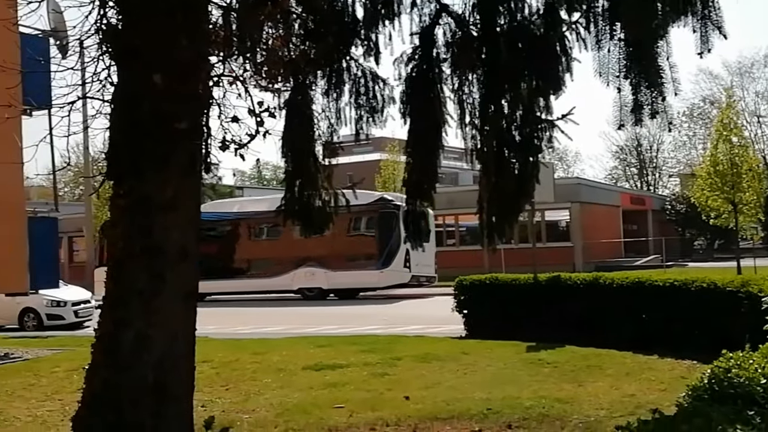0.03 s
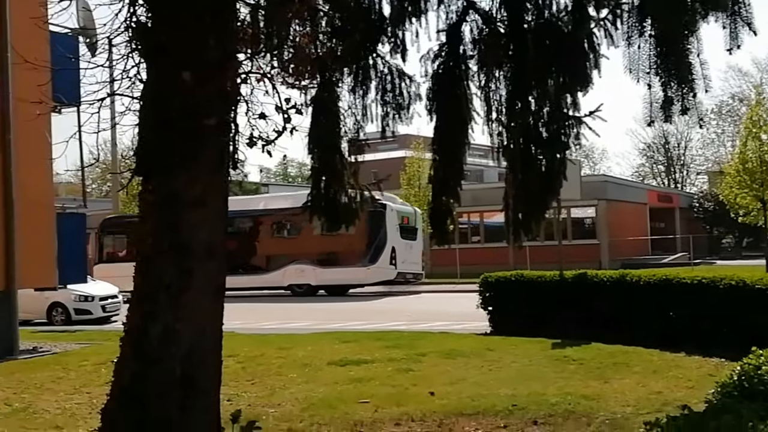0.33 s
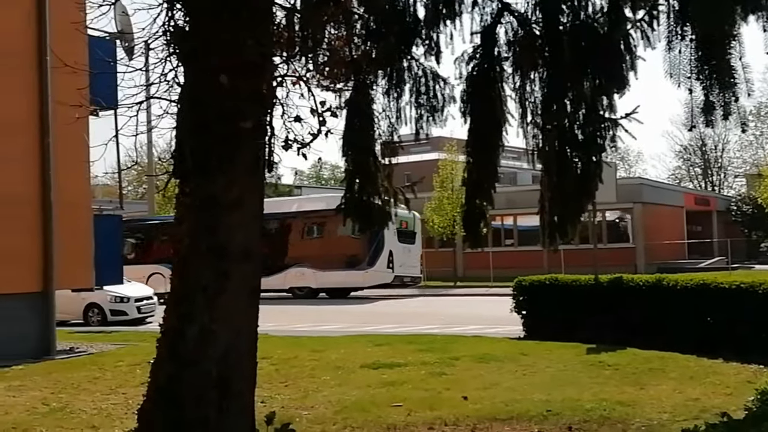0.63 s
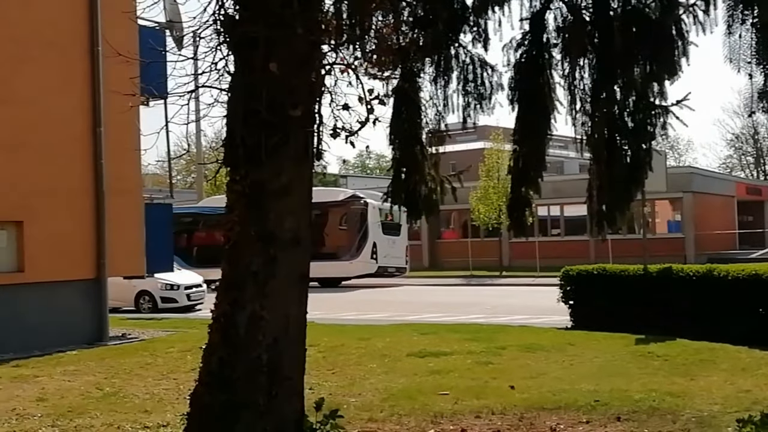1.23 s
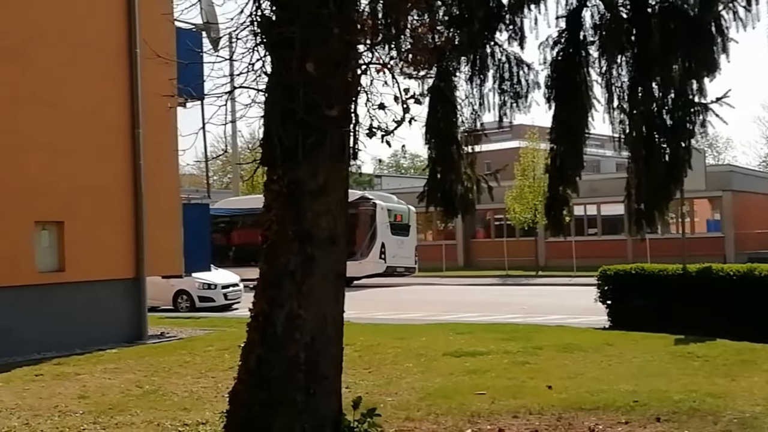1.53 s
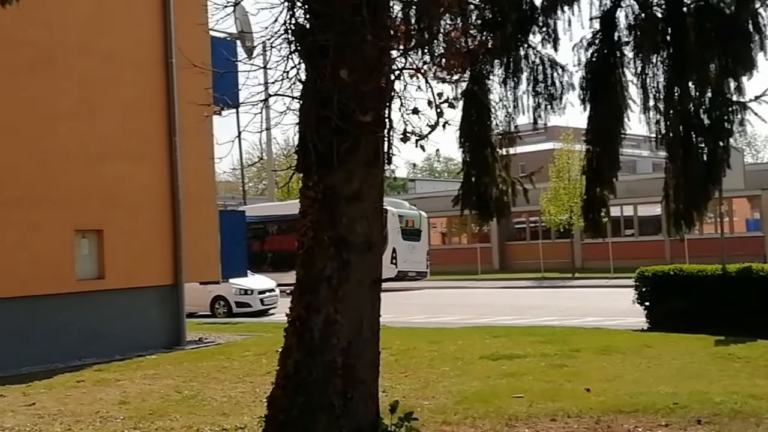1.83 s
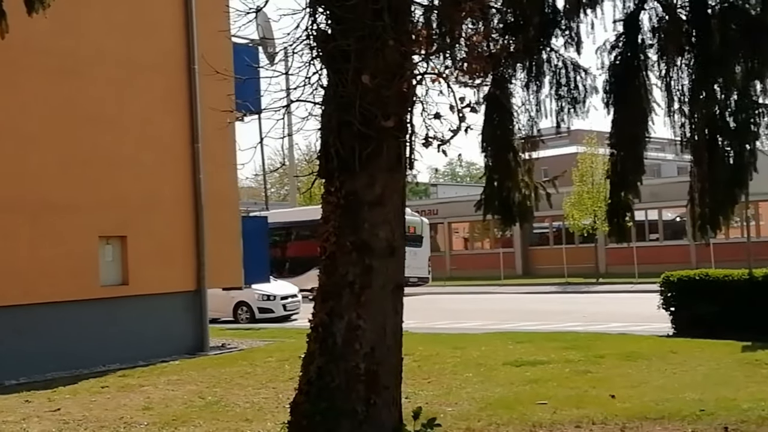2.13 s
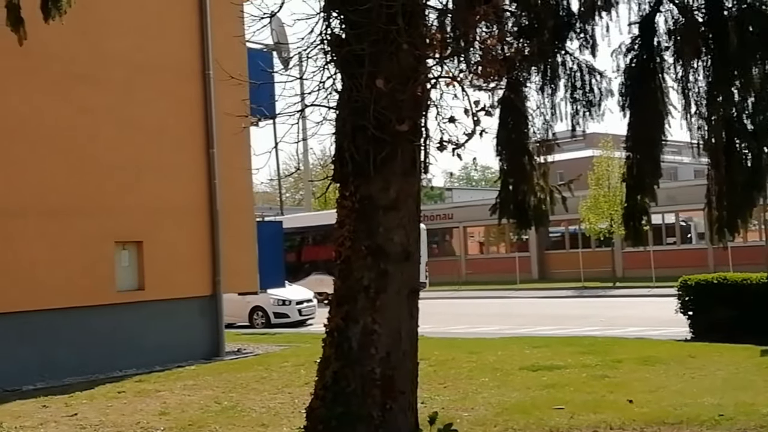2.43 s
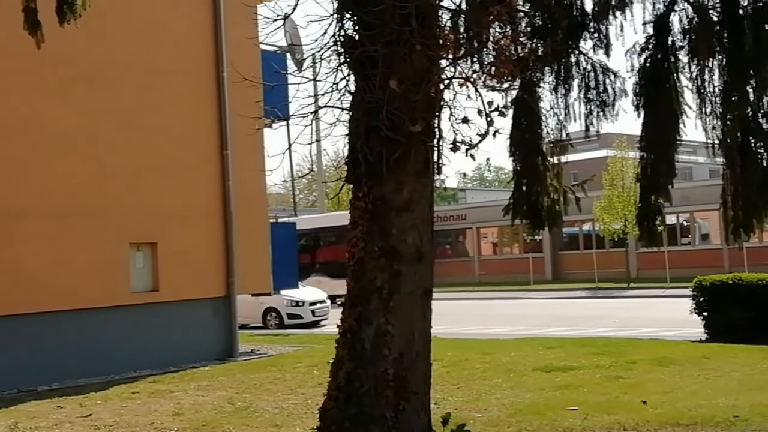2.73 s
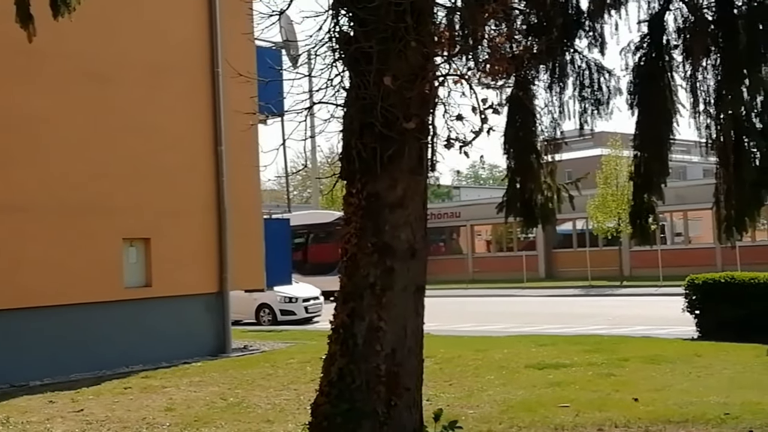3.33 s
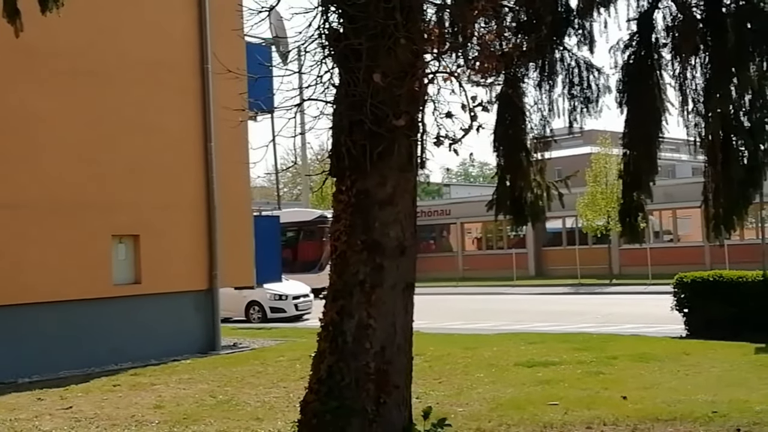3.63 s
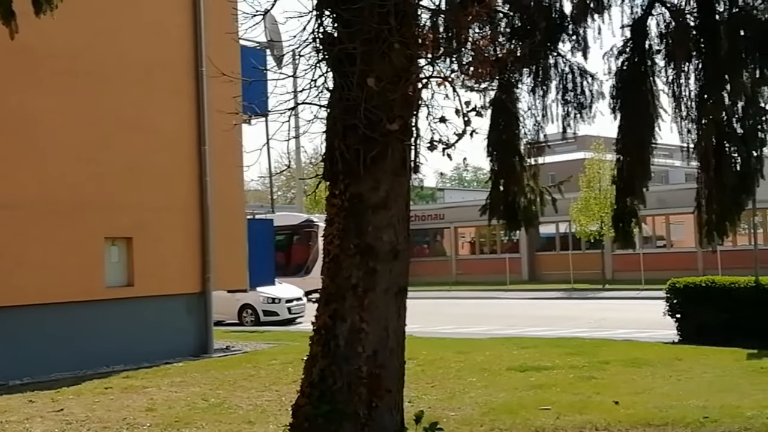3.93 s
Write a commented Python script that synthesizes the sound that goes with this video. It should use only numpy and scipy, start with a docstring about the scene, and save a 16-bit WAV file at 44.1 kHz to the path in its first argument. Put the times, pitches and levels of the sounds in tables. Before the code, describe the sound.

An electric bus slows along a street, heard across a lawn, its low rumble, sinking hum and tyre hiss drifting right. Faint thin whines fade by about 2 seconds. A high brake squeal comes at 1.8 seconds, a short air puff just after 2, then more squeals from 2.7 to 3.3 with a soft knock. A small bird whistles short notes, mostly between 1.5 and 3. The tyres turn grittier late.

```python
"""A sinking hum, body rumble, tyre roar and thin drive whines: an electric bus slows along a street,
heard across a lawn. Its brakes squeal briefly and a valve puffs air while the road noise drifts right.
A small bird whistles in the trees; house fronts answer the bird and the brakes.
Hum, whines, squeals and whistles are gliding sines; road noise and air are shaped stereo noise."""
import sys
import numpy as np
from scipy import signal
from scipy.fft import rfft, irfft, next_fast_len
from scipy.io import wavfile
from scipy.ndimage import uniform_filter1d, map_coordinates

SR = 44100
rng = np.random.default_rng(int(sys.argv[2]) if len(sys.argv) > 2 else 0)


def store_pcm(level_fs):
    """Save levels as 16-bit WAV."""
    pcm = np.round(np.clip(level_fs, -1, 1) * 32767).astype(np.int16)
    wavfile.write(sys.argv[1], SR, np.atleast_2d(pcm).T)


N = 176400
T = np.arange(N) / SR

# left-ear lag as the bus moves aside: (time [s], body [ms], tread [ms])
EAR_LAG = [(0, 0.21, -0.12), (.7, 0.27, 0.041), (1.4, 0.43, 0.072), (2.1, 0.66, 0.5), (4, 0.61, 0.67)]


def amp(db):
    """Decibels to gain."""
    return 10 ** (np.asarray(db) / 20)


def unit(x):
    """Scale to rms 1."""
    return x / np.sqrt(np.mean(x ** 2) + 1e-20)


def along(points, hz):
    """Interpolate (frequency [Hz], value) points on a log axis."""
    freqs, values = np.transpose(points)
    return np.interp(np.log(hz + 1), np.log(freqs + 1), values)


def curves(rows):
    """One value per sample for each column after the time."""
    times, *columns = np.transpose(rows)
    return [np.interp(T, times, column) for column in columns]


def wobble(rate_hz):
    """Smooth random curve, rate_hz knots a second."""
    return map_coordinates(rng.standard_normal(8000), [T * rate_hz + 2], mode="wrap")


def arch(start_s, length_s):
    """Half a sine of height 1."""
    return np.sin(np.pi * np.clip((T - start_s) / length_s, 0, 1))


def tone(hz):
    """Sine of rms 1 following a pitch curve."""
    return np.sqrt(2) * np.sin(2 * np.pi * np.cumsum(hz) / SR)


def filtered(x, response):
    """Apply a gain given as a function of frequency."""
    size = next_fast_len(N + SR // 2)
    return irfft(rfft(x, size) * response(np.fft.rfftfreq(size, 1 / SR)), size)[..., :N]


def colour(points):
    """Gain function from (frequency [Hz], gain [dB]) points."""
    return lambda hz: amp(along(points, hz))


def sides(pan_db):
    """Constant-power stereo gains; pan is left minus right."""
    gains = amp(np.array([[.5], [-.5]]) * pan_db)
    return gains / np.sqrt(np.mean(gains ** 2, axis=0))


def aside(x, lag_ms):
    """Delay the left ear, placing the sound to the right."""
    delayed = np.arange(N) - lag_ms * SR / 1000
    return np.array([map_coordinates(x[0], [delayed], mode="nearest"), x[1]])


def rush(gain, alike, pan, patchy_db):
    """Patchy stereo noise of rms 1; alike (left-right likeness, clipped to +-1) and pan go by Hz."""
    bins = signal.stft(rng.standard_normal((2, N)), nperseg=512)[2]
    patches = uniform_filter1d(rng.standard_normal(bins.shape[1:]), size=5, axis=0)
    patches = uniform_filter1d(patches, size=10, axis=1)
    pair = signal.istft(bins * amp(patchy_db * unit(patches)), nperseg=512)[1][:, :N]
    angle = lambda hz: np.arccos(np.clip(along(alike, hz), -1, 1)) / 2
    mid, side = filtered(pair, lambda hz: gain(hz) * np.array([np.cos(angle(hz)), np.sin(angle(hz))]))
    return unit(filtered(np.array([mid + side, mid - side]), lambda hz: sides(along(pan, hz))))


def hum():
    """Low, slightly unsteady note of the bus with two overtones."""
    # (time [s], pitch [Hz], level [dB])
    fundamental = [(0, 61.1, -53), (.3, 60.5, -46), (.75, 59.35, -49), (1.3, 57.2, -41), (1.55, 57.16, -42),
                   (1.9, 54.74, -44), (2.28, 53.06, -42.5), (2.5, 51.7, -39.5), (2.62, 51.3, -47.5),
                   (2.95, 51.82, -44), (3.45, 52.3, -49), (4, 53.5, -53)]
    # (time [s], second harmonic [dB], third harmonic [dB])
    overtones = [(0, -57, -64), (.35, -51, -66), (.9, -55, -58.5), (1.8, -57.5, -56.5), (2.3, -59, -49.5),
                 (2.75, -68, -66), (3.4, -57, -66), (3.75, -50, -54), (4, -47.5, -55)]
    hz, db = curves(fundamental)
    hz = hz + 0.33 * wobble(7.96)
    out = amp(db + 0.45 * wobble(12)) * tone(hz)
    for harmonic, level_db in enumerate(curves(overtones), start=2):
        out = out + amp(level_db + 2.4 * wobble(5.5)) * tone(harmonic * hz)
    return out * sides(0)


def rolling():
    """Low rumble, body drone, road roar and tread song, drifting right."""
    # (time [s], rumble [dB], drone [dB], roar [dB], tread [dB])
    levels = [(0, -45.5, -51, -55, -54.5), (.45, -45.5, -50.5, -55, -56), (1.2, -44.5, -49, -52.5, -55.5),
              (1.7, -43, -50, -49.5, -59.5), (2.1, -44, -48, -50, -71), (2.5, -45, -46.5, -53, -52.5),
              (2.9, -46, -50.5, -51, -51), (3.4, -47, -47.5, -49, -59), (3.75, -48, -48.5, -53, -59.5),
              (4, -48.5, -47.5, -50.5, -69)]
    # spectra: (frequency [Hz], relative level [dB])
    rumble_shape = [(20, -12), (40, 0), (62, 1), (80, -0.5), (115, -1), (160, -3.5), (210, -5),
                    (300, -21.5), (600, -44), (1500, -70)]
    drone_shape = [(90, -21), (150, -13.5), (195, -4), (245, 0), (310, -5), (370, -8), (450, -15.5),
                   (700, -38), (1500, -74)]
    roar_shape = [(150, -26), (330, -10), (520, -1.5), (680, -3), (900, -1.5), (1150, -9.5), (1450, -14.5),
                  (2200, -29), (4000, -44)]
    # (frequency [Hz], left-right likeness)
    body_alike = [(100, 2.2), (300, 1.8), (600, -0.8)]
    roar_alike = [(300, 0.96), (700, 0.93), (1000, 0.72), (1600, 0.1)]
    # (frequency [Hz], pan [dB])
    roar_pan = [(300, 7), (520, -3), (780, -9), (950, -5), (1200, 1.5), (2000, -18)]
    rumble_db, drone_db, roar_db, tread_db = curves(levels)
    rumble = amp(rumble_db) * rush(colour(rumble_shape), body_alike, [(100, 0)], patchy_db=0.5)
    drone = amp(drone_db) * rush(colour(drone_shape), body_alike, [(250, 1), (500, -6.5)], patchy_db=0.5)
    roar_gain = amp(roar_db + 0.82 * wobble(8.9))
    roar = roar_gain * rush(colour(roar_shape), roar_alike, roar_pan, patchy_db=1)
    body_ms, tread_ms = curves(EAR_LAG)
    return aside(rumble + drone + roar, body_ms) + aside(amp(tread_db) * tread(), tread_ms)


def tread():
    """Tread song: a noise band that sinks and narrows as the bus slows."""
    start_hz, end_hz, start_octaves, end_octaves, slowing_s = 1150, 950, 0.4, 0.13, 0.98
    noise = rush(np.ones_like, alike=[(1000, .65)], pan=[(900, -5), (1200, -1)], patchy_db=1.5)
    hz, t, bins = signal.stft(noise, SR, nperseg=1024)
    speed = np.exp(-(t / slowing_s) ** 2)
    centre_hz = end_hz + (start_hz - end_hz) * speed
    width_octaves = end_octaves + (start_octaves - end_octaves) * speed
    offset_octaves = np.log2((hz[:, None] + 1) / centre_hz)
    band = np.exp(-.5 * (offset_octaves / width_octaves) ** 2) / np.sqrt(width_octaves * centre_hz)
    return unit(signal.istft(bins * band, SR, nperseg=1024)[1][:, :N])


def tyres():
    """Diffuse hiss, with a sizzle and a gritty, resonant rasp that grow and drift right."""
    # (time [s], hiss [dB], sizzle [dB])
    levels = [(0, -53, -63.5), (.8, -52, -62.5), (1.4, -52.5, -56.5), (2, -54, -53.5), (2.4, -53.5, -53.5),
              (2.85, -54.5, -51), (3.2, -56, -52), (3.6, -54.5, -51), (3.85, -56.5, -51), (4, -53, -47.5)]
    # (time [s], level [dB])
    rasp_levels = [(0, -89), (2.2, -67), (2.8, -56.5), (3.3, -52), (3.6, -51), (4, -56.5)]
    # spectra: (frequency [Hz], relative level [dB])
    hiss_shape = [(200, -4), (500, -1), (1000, 5), (1600, 3), (2300, -1), (2950, -1), (3500, 2), (4500, -5),
                  (5300, -4), (6200, -12), (8000, -13.5), (10500, -22), (15000, -26.5)]
    sizzle_shape = [(1200, -22), (2000, -6), (2900, -6), (3600, -2), (4300, -1.5), (5050, -1), (5900, -5.5),
                    (8000, -11.5), (9500, -18.5), (11000, -25), (15000, -36)]
    # (frequency [Hz], pan [dB])
    sizzle_pan = [(2000, -28), (4000, -13), (8000, -24), (14000, 0)]
    # (centre [Hz], width [Hz], relative level [dB])
    resonances = [(1939, 260, -2), (2445, 300, -4.5), (3458, 190, -5.5), (4880, 460, -9)]

    def rasp_response(hz):
        """Resonances summed in power."""
        return np.sqrt(sum(amp(db) ** 2 / (1 + 2 * ((hz - centre_hz) / width_hz) ** 2) ** 2
                           for centre_hz, width_hz, db in resonances))

    hiss_db, sizzle_db = curves(levels)
    grit_db = wobble(110) + 0.26 * wobble(30)
    hiss = amp(hiss_db) * rush(colour(hiss_shape), alike=[(500, 0.083), (2000, 0.012)],
                               pan=[(500, -2.5), (3000, -1.8), (12000, 0.58)], patchy_db=1.53)
    sizzle_gain = amp(sizzle_db + grit_db)
    sizzle = sizzle_gain * rush(colour(sizzle_shape), [(4000, 0.38)], sizzle_pan, patchy_db=1.47)
    rasp_gain = amp(curves(rasp_levels)[0] + 1.33 * grit_db + 0.84 * wobble(65))
    rasp = rasp_gain * rush(rasp_response, alike=[(2000, 0.92), (5000, 0.5)],
                            pan=[(1950, 2), (2450, -26), (2900, 11), (4000, -26)], patchy_db=1)
    return hiss + aside(sizzle + rasp, curves(EAR_LAG)[0])


def whine(hz):
    """Thin, shaky tone that flutters a little differently at each ear."""
    flutter_db, pitch_shake = 3, .002
    flutter = (wobble(14) + np.array([wobble(18), wobble(18)])) / np.sqrt(2)
    return amp(flutter_db * flutter) * tone(hz * (1 + pitch_shake * wobble(90)))


def drive_whines():
    """The drive's tone creeps up; the motor's comes in spurts and sinks; two faint tones lie above."""
    # (time [s], pitch [Hz])
    drive_pitch = [(0, 3522), (1.7, 3650), (2.5, 3705)]
    motor_pitch = [(0, 3600), (.2, 3500), (.55, 3280), (1, 3090), (1.25, 2910), (1.5, 2760)]
    # (time [s], level [dB])
    drive_levels = [(0, -67), (.28, -66), (.36, -58), (.45, -57), (.58, -71), (.68, -60.5), (.88, -67.5),
                    (1.12, -62.5), (1.26, -70), (1.38, -58.5), (1.47, -72), (1.55, -63), (1.8, -69),
                    (2.6, -80), (3, -110)]
    # (start [s], length [s], peak [dB])
    spurts = [(.15, .15, -61), (.33, .11, -58.5), (.51, .13, -60.5), (.66, .11, -60), (.92, .2, -68),
              (1.14, .24, -63.5), (1.32, .16, -71)]
    # (start [s], peak [s], end [s], first pitch [Hz], last pitch [Hz], peak [dB])
    upper_tones = [(-.5, 1.2, 2.0, 4495, 4290, -72), (-.5, 1.15, 2.1, 7970, 7950, -79)]
    drive = amp(curves(drive_levels)[0]) * whine(curves(drive_pitch)[0])
    motor_gain = sum(amp(db) * arch(start_s, length_s) for start_s, length_s, db in spurts)
    motor = motor_gain * whine(curves(motor_pitch)[0])
    upper = np.zeros((2, N))
    for start_s, peak_s, end_s, first_hz, last_hz, db in upper_tones:
        swell = np.interp(T, [start_s, peak_s, end_s], [0, 1, 0])
        upper += amp(db) * swell * whine(np.interp(T, [start_s, end_s], [first_hz, last_hz]))
    return sides(pan_db=-5) * (drive + motor) + sides(pan_db=4) * upper


def bird():
    """Broken falling whistles, then short slurred notes; the wider the slide, the rougher."""
    # (start [s], length [s], first pitch [Hz], last pitch [Hz], level [dB], pan [dB])
    notes = [(.905, .033, 4300, 4310, -57.5, -6), (1.565, .06, 8200, 7450, -67, -6),
             (1.61, .115, 7600, 6580, -62.5, -6), (1.722, .032, 6500, 6330, -60.5, -6),
             (1.815, .055, 6900, 5500, -59, -1), (1.86, .08, 5450, 4980, -56.5, -1),
             (2.02, .03, 6500, 6330, -57.5, -5), (2.055, .031, 5900, 5300, -55.5, -5),
             (2.088, .026, 5100, 5000, -55, -5), (2.17, .07, 4720, 4690, -52, -4),
             (2.295, .05, 4520, 4720, -57.5, 0), (2.425, .08, 4450, 4700, -63, -2),
             (2.58, .035, 4560, 4640, -58, -2), (2.685, .06, 4480, 4610, -53.5, -1),
             (2.92, .032, 4310, 4290, -54, -9), (2.988, .03, 5400, 5460, -54, -9),
             (3.088, .038, 4310, 4290, -55.5, -9)]
    bend, roughness, flutter_db = 1.4, .07, 2.8
    out = np.zeros((2, N))
    for start_s, length_s, first_hz, last_hz, db, pan_db in notes:
        progress = np.clip((T - start_s) / length_s, 0, 1)
        slide = (1 - progress) ** bend + roughness * wobble(450)  # quick at first, then settling
        hz = last_hz + (first_hz - last_hz) * slide + 28 * wobble(200)
        swell = np.abs(np.sin(np.pi * progress ** 1.5)) ** .5  # peaks late
        out += sides(pan_db) * amp(db + flutter_db * wobble(60.6)) * swell * tone(hz)
    return out


def squeal(envelope, first_hz, last_hz, pan_db):
    """A brake catches, flutters and lets go while its pitch settles a little."""
    flutter_db = 2.6
    start_s, end_s = envelope[0][0], envelope[-1][0]
    progress = np.clip((T - start_s) / (end_s - start_s), 0, 1)
    gain = amp(curves(envelope)[0] + flutter_db * wobble(65)) * (progress > 0) * (progress < 1)
    hz = last_hz + (first_hz - last_hz) * (1 - progress) ** 2 + 8 * wobble(120)
    return sides(pan_db) * gain * tone(hz)


def brakes():
    """Two high squeals and a lower one, on the right."""
    # envelopes: (time [s], level [dB])
    first = [(1.74, -80), (1.765, -55), (1.781, -46.5), (1.803, -57), (1.82, -76), (1.88, -82)]
    long = [(2.71, -84), (2.745, -63), (2.78, -73), (2.795, -63), (2.89, -65), (2.948, -51.5), (3.02, -65),
            (3.055, -57.5), (3.11, -62), (3.2, -84)]
    low = [(3.04, -75), (3.065, -56), (3.12, -48.5), (3.152, -50), (3.165, -68), (3.177, -51), (3.195, -68),
           (3.25, -57), (3.32, -78)]
    return (squeal(first, first_hz=10265, last_hz=10255, pan_db=-19)
            + squeal(long, first_hz=10256, last_hz=10234, pan_db=-19)
            + squeal(low, first_hz=7065, last_hz=6965, pan_db=-16))


def air_puff():
    """A valve opens, blows briefly and dies away."""
    # (frequency [Hz], relative level [dB])
    shape = [(2000, -13), (3800, -9), (5000, 2), (6500, -1.5), (9000, -5), (10500, -15), (13500, -16),
             (15000, -28)]
    open_s, rise_s, hold_s, level_db, fall_db_per_s = 1.96, 0.16, 0.095, -51, 67
    t = T - open_s
    fall_db = fall_db_per_s * np.maximum(t - rise_s - hold_s, 0)
    gain = np.clip(t / rise_s, 0, 1) * amp(level_db - fall_db)
    return gain * rush(colour(shape), alike=[(6000, 0.17)],
                       pan=[(5000, 10.9), (9000, 5.2), (12000, 1)], patchy_db=1.5)


def tick():
    """One very short, thin burst of noise."""
    # (frequency [Hz], relative level [dB])
    shape = [(8000, -30), (10500, -3), (13000, 0), (14000, -4), (15000, -15)]
    noise = rush(colour(shape), alike=[(12000, 0.37)], pan=[(12000, -6)], patchy_db=-1)
    return amp(-68) * arch(start_s=2.767, length_s=.022) * noise


def knock():
    """Soft knock from the bus: one quickly damped ring."""
    start_s, ring_hz, t60_s, peak_db = 2.969, 904, .05, -42
    t = np.maximum(T - start_s, 0)
    decay = np.exp(-np.log(1000) * t / t60_s)
    return sides(pan_db=-9.5) * amp(peak_db) * decay * np.sin(2 * np.pi * ring_hz * t)


def street(x):
    """Diffuse answer of the house fronts."""
    # (frequency [Hz], T60 [s])
    decay_times = [(300, 0.2), (3000, 1), (10000, 0.75)]
    hz, t, bins = signal.stft(rng.standard_normal((2, SR // 2)), SR, nperseg=256)
    decay = 1e-3 ** (t / along(decay_times, hz)[:, None])
    tail = signal.istft(bins * decay, SR, nperseg=256)[1]
    return signal.fftconvolve(x, tail / np.linalg.norm(tail[0]), axes=1)[:, :N]


def scene():
    """Bus and bird in the open street."""
    song, squeals = bird(), brakes()
    echo = street(amp(-19) * squeals + amp(-6) * song)
    bus = hum() + rolling() + tyres() + air_puff() + drive_whines() + squeals + tick() + knock()
    return bus + song + echo


def record(dry):
    """Brick-wall low-pass."""
    top_hz = 15150
    return filtered(dry, lambda hz: hz < top_hz)


dry = scene()
out = record(dry)
store_pcm(out)
```